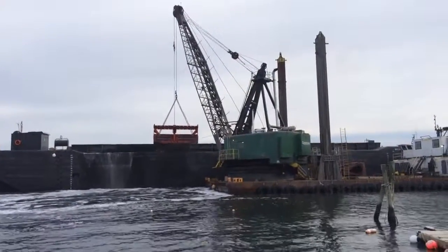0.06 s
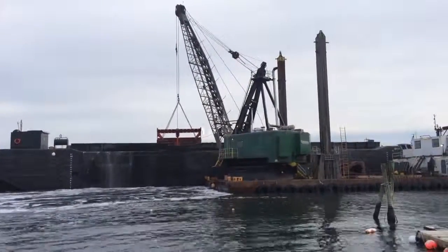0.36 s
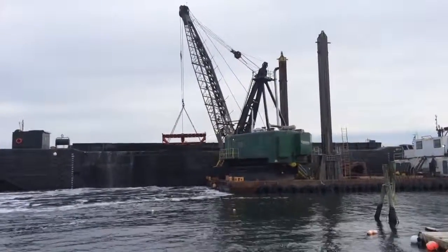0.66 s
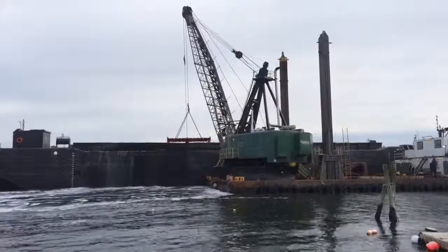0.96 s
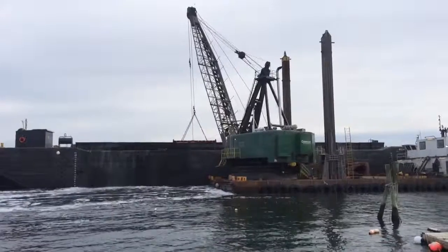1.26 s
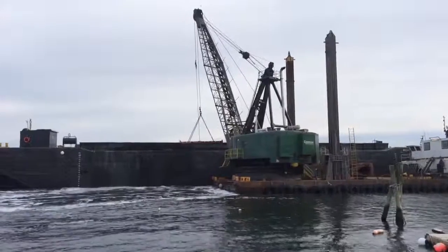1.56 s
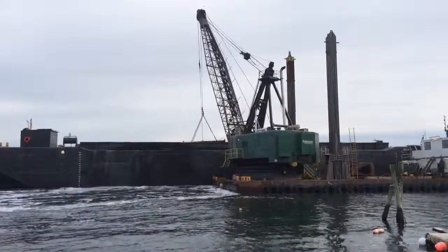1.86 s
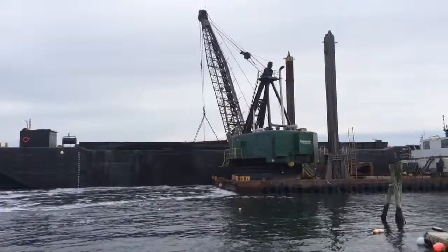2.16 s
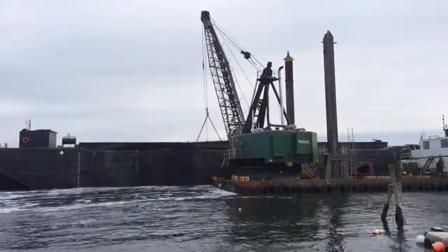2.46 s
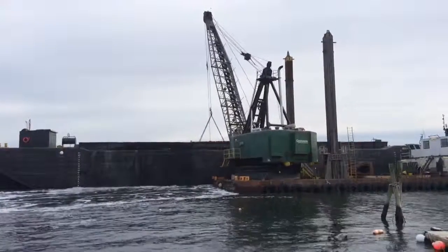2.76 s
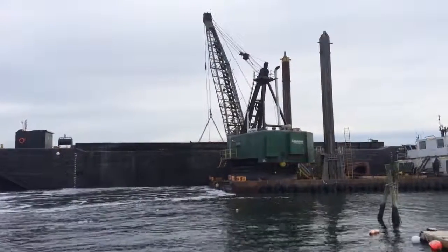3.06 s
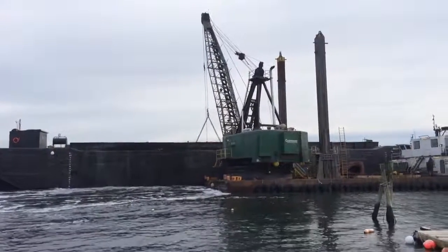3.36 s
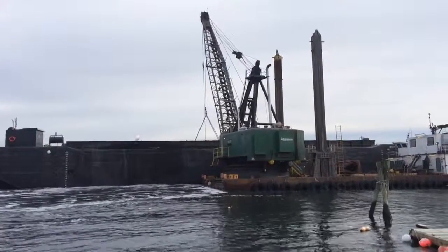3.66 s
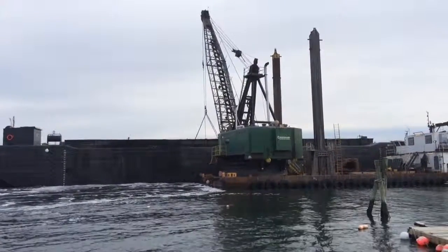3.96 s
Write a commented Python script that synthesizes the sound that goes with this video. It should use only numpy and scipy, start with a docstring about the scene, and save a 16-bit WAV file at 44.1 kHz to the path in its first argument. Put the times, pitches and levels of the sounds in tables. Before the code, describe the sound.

A dredging crane lowers its bucket across open water, with diesels droning, a thin, slowly sinking whistle and faint chop throughout. The winch rattles from the start, and from 0.2 seconds bucket and chains clank on steel. From about 1 to 1.8 seconds the brake rubs and pulleys squeal. The hollow barge booms between 1.4 and 2.7 seconds, and a light knock follows at 3.1.

```python
"""A dredging crane lowers its bucket into a steel barge, heard across open water.
Throughout, two diesels drone under a sagging turbo whistle and choppy water washes faintly.
First the winch rattles and the rope runs out; from 0.2 s bucket and chains clank on steel.
Around 1 s the brake rubs and the rope sheaves squeal. From 1.4 to 2.7 s the hollow hull booms
as the load lands, and lapping water ticks faintly; a last light knock follows at 3.1 s."""
import sys
import numpy as np
from scipy import signal
from scipy.fft import rfft, irfft
from scipy.io import wavfile

SR = 44100
rng = np.random.default_rng(int(sys.argv[2]) if len(sys.argv) > 2 else 0)


def int16_out(signal):
    """Quantize to a 16-bit WAV file."""
    q = np.round(np.clip(np.atleast_2d(signal).T, -1, 1) * 32767)
    wavfile.write(sys.argv[1], SR, q.astype(np.int16))


N = 176400
T = np.arange(N) / SR


def from_db(db):
    """Decibels to gain."""
    return 10 ** (np.asarray(db) / 20)


def unit_rms(x):
    """Scale to rms 1."""
    return x / np.sqrt(np.mean(x ** 2) + 1e-20)


def curves(rows):
    """Breakpoints to one linear curve per column after t/s."""
    times_s, *columns = np.transpose(rows)
    return [np.interp(T, times_s, column) for column in columns]


def drift(rate_hz):
    """Random wander below rate_hz, rms 1."""
    hop, settle = 40, 2000
    pole = np.exp(-2 * np.pi * rate_hz * hop / SR)
    noise = rng.standard_normal(N // hop + settle + 2)
    slow = signal.lfilter([1], [1, -2 * pole, pole * pole], noise)[settle:]
    return np.interp(np.arange(N) / hop, np.arange(len(slow)), unit_rms(slow))


def colour(x, spectrum):
    """Minimum-phase filter; white noise keeps its level."""
    hz, db = np.transpose(spectrum)
    bins_hz = np.arange(N + 1) * SR / (2 * N)
    gain = unit_rms(from_db(np.interp(np.log(bins_hz + 1), np.log(hz), db)))
    cepstrum = irfft(np.log(gain))[:N] * np.r_[1, np.full(N - 1, 2)]
    return irfft(rfft(x, 2 * N) * np.exp(rfft(cepstrum, 2 * N)))[:N]


def ringing(drive, modes):
    """Two-pole resonators, levels relative to the drive."""
    out = 0
    for hz, db, t60_s in modes:
        radius, angle = from_db(-60 / (t60_s * SR)), 2 * np.pi * hz / SR
        mode = signal.lfilter([1, 0, -1], [1, -2 * radius * np.cos(angle), radius ** 2], drive + 1e-18)
        out += from_db(db) * unit_rms(mode)
    return out * drive.std()


def noise_band(hz, width_hz):
    """Band-passed noise, rms 1."""
    edges_hz = np.clip([hz - width_hz / 2, hz + width_hz / 2], 10, SR / 2 - 1)
    bandpass = signal.butter(2, edges_hz, "band", fs=SR, output="sos")
    return unit_rms(signal.sosfilt(bandpass, rng.standard_normal(N)))


def grains(per_s, spread_db):
    """Random impulses of uneven size, rms 1."""
    sizes = from_db(spread_db * np.minimum(rng.exponential(1, N), 4))
    return unit_rms(sizes * rng.choice([-1, 1], N) * (rng.random(N) < per_s / SR))


def strike(start_s, attack_s, t60_s):
    """Envelope: linear rise, exponential decay."""
    rise = np.clip((T - start_s) / attack_s, 0, 1)
    return rise * from_db(-60 * np.maximum(T - start_s - attack_s, 0) / t60_s)


def wander_phase(hz, wobble, rate_hz):
    """Phase of a tone with relative rms pitch deviation wobble."""
    return 2 * np.pi * np.cumsum(hz * (1 + wobble * drift(rate_hz))) / SR


# water spectrum: f/Hz, level/dB
WATER_SPECTRUM = [(1500, 6.5), (3000, -11), (5000, -8.5), (8000, -17.5), (14000, -22.5)]

def water():
    """Chop and foam fizz faintly."""
    return from_db(-43.5 + 0.31 * drift(0.6)) * colour(grains(per_s=14000, spread_db=3.5), WATER_SPECTRUM)


# engine tones: order, level/dB
CRANE_TONES = [(9, -39.5), (12, -41.5), (16, -49)]
PUMP_TONES = [(2, -52), (7, -38.5), (8, -38), (16, -58), (24, -61.5)]
# engine noise spectra: f/Hz, level/dB
EXHAUST_SPECTRUM = [(20, -59.5), (36, -40), (48, 5.5), (70, 5.5), (90, 8), (155, 9), (205, 6.5), (250, -2),
                    (310, -10.5), (600, -47)]
CLATTER_SPECTRUM = [(150, -6), (370, 7.5), (520, -6), (1400, -6), (2200, -6.5), (2800, -27), (3600, -14),
                    (4800, -19.5), (7500, -31), (15000, -67)]
CRANE_CYCLE_HZ, FIRINGS_PER_CYCLE, PUMP_HZ = 15.14, 12, 24.71
EXHAUST_DB, CLATTER_DB = -31, -44

def diesels():
    """Crane and pump engines hum; the crane's uneven firings boom in its exhaust, with clatter above."""
    crane = wander_phase(CRANE_CYCLE_HZ, wobble=0.002, rate_hz=1.2)
    pump = wander_phase(PUMP_HZ, wobble=0.00262, rate_hz=0.8)
    tones = 0
    for phase, orders in ((crane, CRANE_TONES), (pump, PUMP_TONES)):
        for order, db in orders:
            amplitude = np.sqrt(2) * from_db(db + 1.93 * drift(2.45))
            tones += amplitude * np.sin(order * phase + rng.uniform(0, 2 * np.pi))
    firings = np.diff(np.floor(crane * FIRINGS_PER_CYCLE / (2 * np.pi)), prepend=0)
    puffs = unit_rms(firings * rng.standard_normal(N))
    turbulence = 0.9 * rng.standard_normal(N)
    exhaust = from_db(EXHAUST_DB) * unit_rms(colour(puffs + turbulence, EXHAUST_SPECTRUM))
    clatter = unit_rms(rng.standard_normal(N) * (1 + 0.08 * np.sin(4 * crane)))
    return tones + exhaust + from_db(CLATTER_DB) * colour(clatter, CLATTER_SPECTRUM)


# whistle curve: t/s, f/Hz, relative level/dB
TURBO_CURVE = [(0, 7570, -61), (1.6, 7400, -69), (2.0, 7260, -62), (2.35, 7190, -57), (2.9, 7020, -64),
               (4, 6900, -64)]

def turbo():
    """Rushing air whistles, sinking as the load comes off; its octave is a faint blur."""
    hz, db = curves(TURBO_CURVE)
    phase = wander_phase(hz, wobble=0.0047, rate_hz=310)
    amplitude = np.sqrt(2) * from_db(db - 1.5 + 3.3 * drift(19))
    octave = from_db(-7) * drift(170) * np.sin(2 * phase)
    return amplitude * (np.sin(phase) + octave)


# gear rattle, rope and brake envelopes: t/s, level/dB
RATTLE_CURVE = [(0, -32.5), (.5, -34.5), (.63, -32.5), (.97, -30.5), (1.08, -38), (1.19, -38.5), (1.4, -36),
                (1.6, -34.5), (1.75, -37.5), (2.0, -36.5), (2.3, -45), (4, -44)]
ROPE_CURVE = [(0, -55.5), (.25, -62), (.42, -64), (.72, -60), (1.0, -80)]
BRAKE_CURVE = [(.9, -38.5), (1.17, -32), (1.24, -25.5), (1.36, -32.5), (1.55, -32.5), (1.68, -42.5),
               (1.85, -67)]
# rattle spectrum: f/Hz, level/dB
RATTLE_SPECTRUM = [(280, -3.5), (450, 1.5), (650, 0), (820, -3), (1300, -5), (2200, -13.5), (2850, -26),
                   (3600, -24), (5500, -32.5), (12000, -35.5), (15000, -40)]
# brake resonances: f/Hz, width/Hz, relative level/dB
BRAKE_RESONANCES = [(1797, 68, -7.5), (2010, 140, -7), (2320, 250, -13.5), (3600, 1600, -19),
                    (4080, 870, -16), (5500, 2900, -17), (11600, 3700, -26)]

def winch():
    """Gears rattle, and whine with the singing rope as it runs out; then the brake rubs."""
    rattle_gain = from_db(curves(RATTLE_CURVE)[0] + 2.1 * drift(3.4))
    rattle = rattle_gain * colour(grains(per_s=4200, spread_db=1), RATTLE_SPECTRUM)
    rope = noise_band(10820, width_hz=480)
    gear_whine = from_db(20) * noise_band(665, width_hz=20)
    running = from_db(curves(ROPE_CURVE)[0]) * (rope + gear_whine)
    rub = sum(from_db(db + 2 * drift(9.7)) * noise_band(hz, width_hz)
              for hz, width_hz, db in BRAKE_RESONANCES)
    braking = (T > BRAKE_CURVE[0][0]) * (T < BRAKE_CURVE[-1][0])
    return rattle + running + rub * from_db(curves(BRAKE_CURVE)[0]) * braking


# squeals: relative octave level/dB, curve of (t/s, f/Hz, level/dB)
SHEAVE_SQUEALS = [(-12, [(1.1, 1990, -49), (1.35, 1985, -38.5), (1.55, 1950, -49), (1.72, 1945, -53)]),
                  (-6.5, [(1.0, 3510, -66), (1.08, 3480, -52), (1.24, 3372, -40.5), (1.345, 3370, -42.5),
                  (1.405, 3378, -48), (1.45, 3390, -42.5), (1.68, 3414, -62)]), (-34, [(1.02, 4030, -53),
                  (1.25, 4100, -53), (1.41, 4157, -40), (1.47, 4175, -41), (1.5, 4270, -39.5),
                  (1.555, 4275, -36), (1.585, 4330, -46), (1.8, 4260, -66)])]
# squeaks: t/s, f/Hz, level/dB, t60/s
SHEAVE_SQUEAKS = [(.39, 3620, -46, 0.24), (.65, 6240, -40, 0.25), (0.966, 6265, -33, 0.1),
                  (.98, 11300, -46, 0.25), (1.45, 2450, -36.5, 0.37), (1.5, 13200, -56, 0.36)]

def sheaves():
    """Dry sheaves squeak and squeal in rough, fluttering tones; the octave grows with the grip."""
    out = 0
    for octave_db, curve in SHEAVE_SQUEALS:
        hz, db = curves(curve)
        sounding = (T > curve[0][0]) * (T < curve[-1][0])
        grip = from_db(db + 2.96 * drift(21)) * sounding
        roughness = 1 + 0.43 * drift(290)
        phase = wander_phase(hz, wobble=0.0038, rate_hz=140)
        octave = from_db(octave_db + 0.5 * (db - db.max())) * np.sin(2 * phase)
        out += grip * roughness * (np.sin(phase) + octave)
    for start_s, hz, db, t60_s in SHEAVE_SQUEAKS:
        squeak = np.sin(wander_phase(hz, wobble=0.0081, rate_hz=220))
        out += from_db(db) * strike(start_s, attack_s=0.0036, t60_s=t60_s) * squeak
    return np.sqrt(2) * out


# snaps and ticks: t/s, relative level/dB, t60/s, f/Hz
CHAIN_SNAPS_AND_WATER_TICKS = [(0.21, -37, 0.11, 3600), (.235, -33, 0.21, 4250), (0.303, -39, 0.079, 3970),
                               (.367, -45.5, 0.38, 3610), (0.527, -37.5, .1, 3890),
                               (0.573, -36, 0.45, 3670), (.595, -40, 0.17, 6800), (0.647, -40, 0.69, 5530),
                               (.703, -39.5, 0.15, 6240), (0.745, -34.5, 0.38, 5510),
                               (0.803, -36.5, 0.7, 5340), (.905, -38.5, 0.68, 5530),
                               (1.213, -26, 0.13, 6780), (1.245, -38, 0.59, 5370),
                               (1.701, -43, 0.065, 4980), (1.741, -44, .07, 4440), (2.69, -43, 0.26, 3890),
                               (2.742, -44.5, 0.8, 4320), (3.098, -38, 0.14, 2620)]
# clink modes: frequency ratio, level/dB
CLINK_MODES = [(1.002, -11), (1.659, -17.5), (2.48, -22)]
# burst spectrum: f/Hz, level/dB
BURST_SPECTRUM = [(1000, 9), (2200, 6), (2900, 0), (3700, 2.5), (4800, 1.5), (6800, -5), (8000, -8.5),
                  (12500, -8), (15000, -25)]

def chains_and_water_ticks():
    """Chain links snap and clink; the faint ticks near 1.7 and 2.7 s are water lapping."""
    rings, power = 0, 0
    jostle_db = 1.8 * drift(70) - 1
    for start_s, db, t60_s, hz in CHAIN_SNAPS_AND_WATER_TICKS:
        burst = from_db(db + jostle_db) * strike(start_s, attack_s=0.006, t60_s=t60_s)
        clink = sum(from_db(mode_db) * noise_band(hz * ratio, width_hz=66)
                    for ratio, mode_db in CLINK_MODES)
        dull_ring = from_db(-7.5) * noise_band(hz, width_hz=940)
        rings += burst * (dull_ring + clink)
        power += burst ** 2
    crackle = np.sqrt(power) * grains(per_s=11000, spread_db=-0.5)
    return rings + from_db(-1) * colour(crackle, BURST_SPECTRUM)


# booms: t/s, level/dB, f/Hz, t60/s
HULL_BOOMS = [(1.374, -30.5, 121.2, 0.16), (1.589, -16.5, 180.4, 0.29), (1.63, -26.5, 68, 0.18),
              (2.151, -26.5, 164.4, 0.15), (2.318, -21.5, 80, 0.62), (2.632, -22.5, 110, 0.083),
              (2.676, -20.5, 163, 0.29)]

def hull():
    """The hollow barge answers the load with rough low booms that rattle its plating."""
    plating = from_db(-14.5) * noise_band(407, width_hz=310)
    out = 0
    for start_s, db, hz, t60_s in HULL_BOOMS:
        boom = np.sqrt(2) * np.sin(wander_phase(hz, wobble=0.152, rate_hz=106))
        out += from_db(db) * strike(start_s, attack_s=0.0042, t60_s=t60_s) * (boom + plating)
    return out


# knocks: t/s, relative level/dB, attack/s, t60/s, plate f/Hz
BUCKET_KNOCKS = [(.236, -26, 0.022, 0.22, 1200), (0.26, -22.5, .02, 0.22, 655),
                 (0.303, -23.5, 0.001, 0.085, 644), (0.369, -27.5, 0.0086, 0.11, 1415),
                 (.598, -28.5, 0.019, 0.98, 583), (0.745, -24, 0.0012, 0.36, 1300),
                 (0.823, -20.5, 0.014, 0.24, 620), (.908, -22.5, .022, 0.15, 1500),
                 (1.216, -15.5, 0.0034, 0.2, 1236), (1.238, -23.5, 0.0064, 0.91, 920),
                 (1.296, -23, 0.0026, 0.26, 603), (1.373, -22, 0.01, 0.33, 464),
                 (1.79, -32.5, 0.0049, 0.94, 1310), (2.634, -34, 0.011, 0.94, 400),
                 (3.097, -34, 0.014, 0.49, 1400)]
# steel contact spectrum: f/Hz, level/dB
STEEL_SPECTRUM = [(150, -22.5), (330, -11), (570, 7), (740, -2.5), (1000, 1.5), (1500, -0.5), (2300, -8.5),
                  (2850, -19.5), (3700, -33), (7000, -48), (14000, -67)]
# bucket modes: f/Hz, relative level/dB, t60/s
BUCKET_MODES = [(572.5, -17, 0.4), (812, -16, 0.24), (973, -22.5, 0.67), (1096, -31, .25), (1355, -19, 0.2),
                (1820, -15, 0.4)]

def bucket():
    """Each knock is a crack and a dying clatter of contacts; struck plate and bucket ring."""
    plates, power = 0, 0
    for start_s, db, attack_s, t60_s, hz in BUCKET_KNOCKS:
        crack = 0.25 * strike(start_s, attack_s, t60_s=0.14)
        knock = from_db(db) * (strike(start_s, attack_s, t60_s) + crack)
        plates += from_db(-3) * knock * noise_band(hz, width_hz=205)
        power += knock ** 2
    contacts = np.sqrt(power) * grains(per_s=6000, spread_db=2.2)
    return from_db(-3.5) * (plates + colour(contacts, STEEL_SPECTRUM) + ringing(contacts, BUCKET_MODES))


ECHO_DB, ECHO_T60_S = -10.5, 0.38

def scene():
    """Mono mix at the shore; the sharp sounds scatter off the barge in a short tail."""
    sharp = bucket() + chains_and_water_ticks() + sheaves()
    scatter = grains(per_s=1100, spread_db=-5) * strike(0.012, attack_s=0.01, t60_s=ECHO_T60_S)
    echo = signal.fftconvolve(sharp, scatter / np.linalg.norm(scatter))[:N]
    return (sharp + from_db(ECHO_DB) * echo + diesels() + turbo() + winch() + hull() + water())[None]


CUTOFF_HZ = 15300

def record(dry):
    """Steep elliptic low-pass."""
    return signal.sosfilt(signal.ellip(16, 0.1, 90, CUTOFF_HZ, fs=SR, output="sos"), dry)


dry = scene()
out = record(dry)
int16_out(out)
```